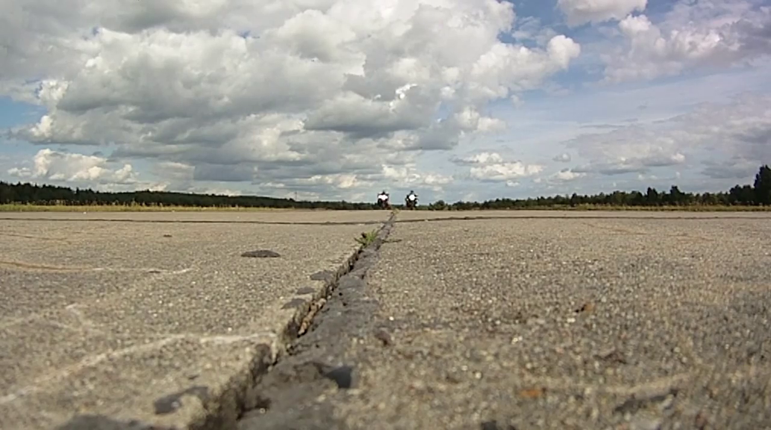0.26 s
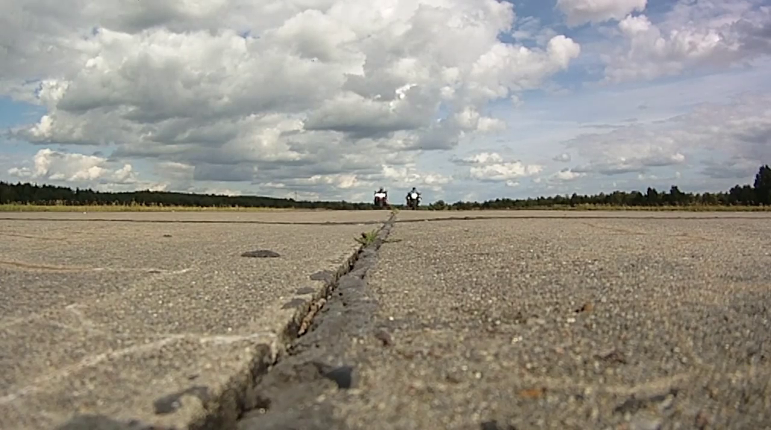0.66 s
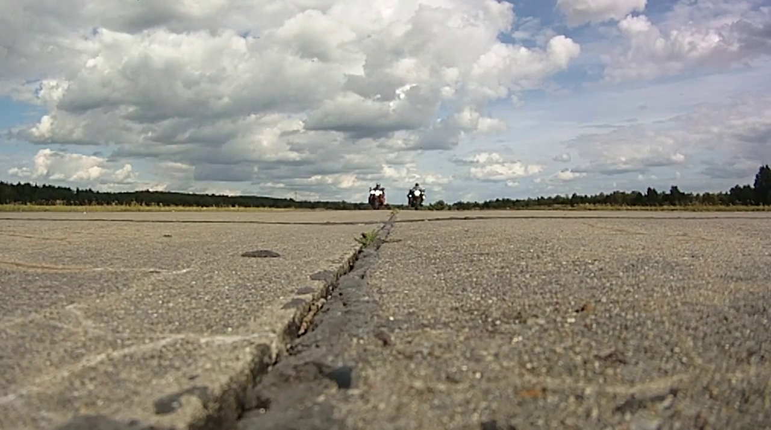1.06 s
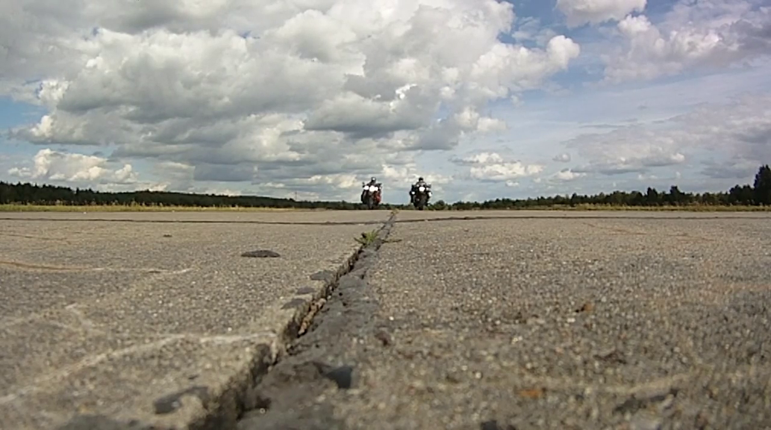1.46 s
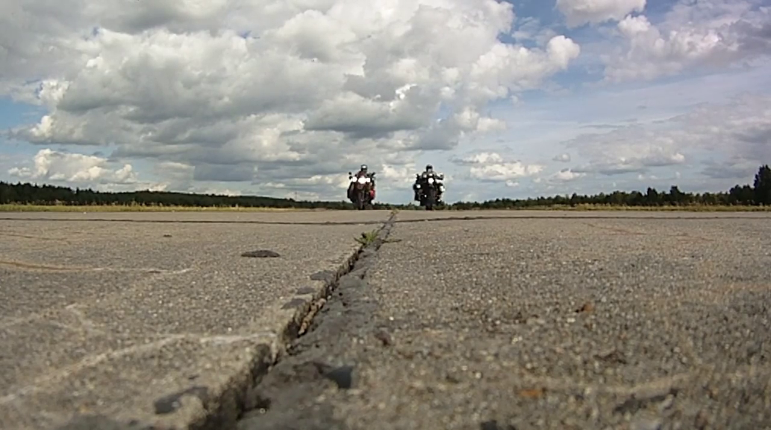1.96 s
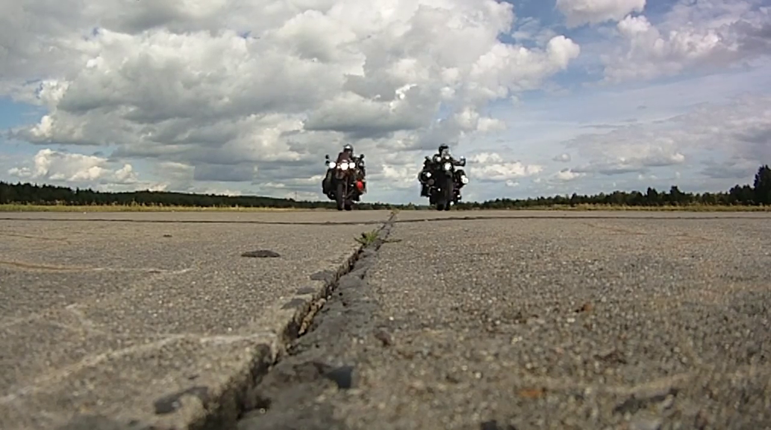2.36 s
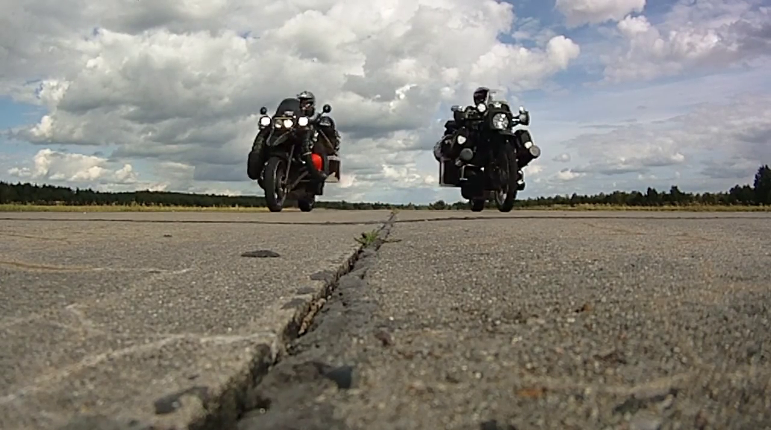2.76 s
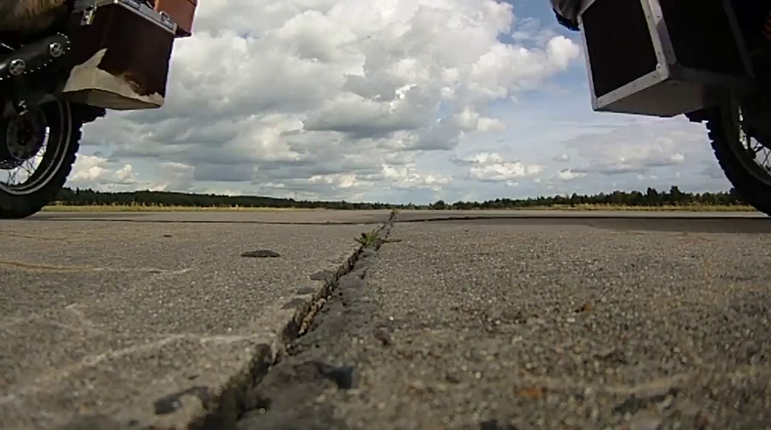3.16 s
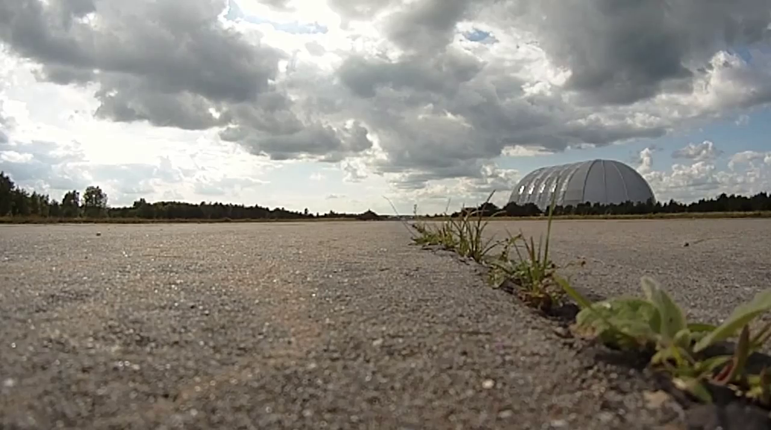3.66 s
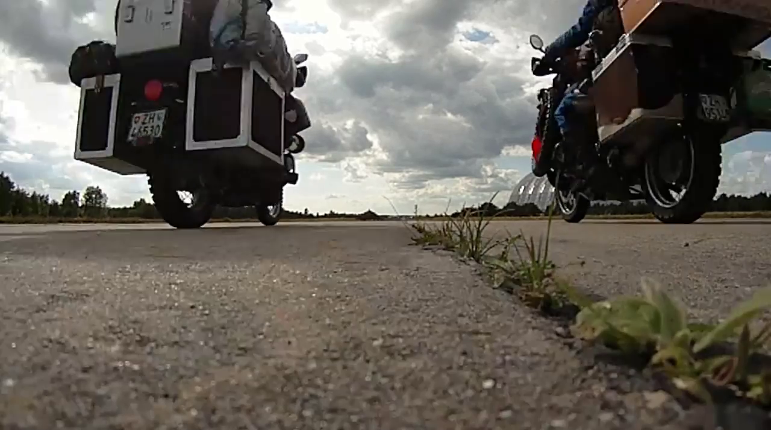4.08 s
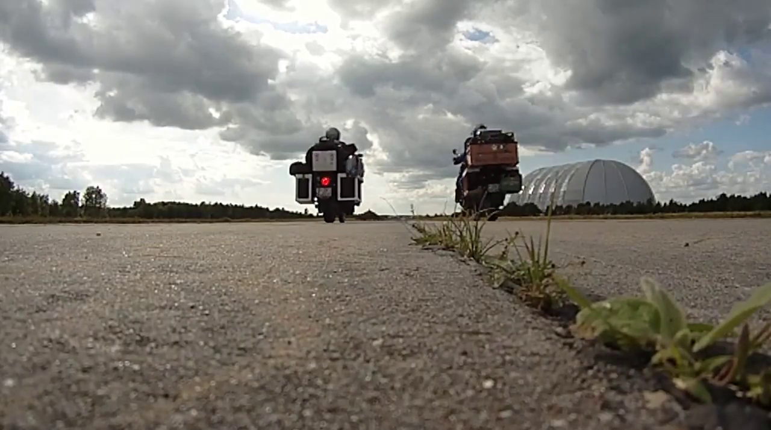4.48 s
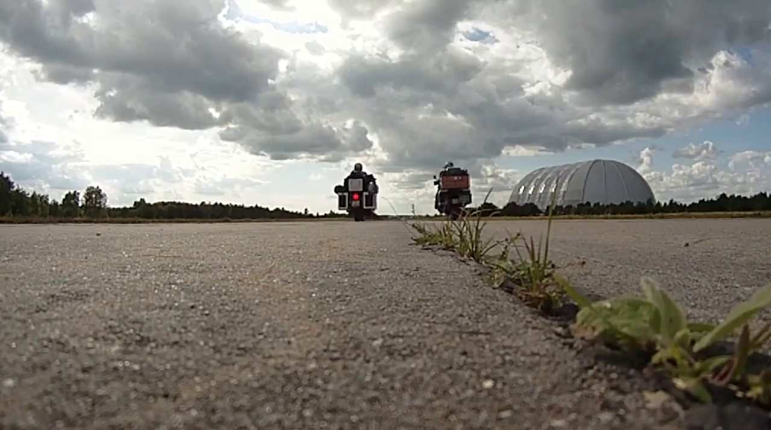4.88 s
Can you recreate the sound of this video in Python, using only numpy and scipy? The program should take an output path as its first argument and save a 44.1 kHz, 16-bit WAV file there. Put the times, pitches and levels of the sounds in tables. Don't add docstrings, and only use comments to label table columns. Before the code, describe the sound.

Two heavy twin-cylinder motorcycles approach from far off, throb louder, roar past a ground-level microphone, then pass again with clipped, pumping exhaust blasts.

```python
import sys
import numpy as np
from scipy import signal
from scipy.fft import rfft, irfft, next_fast_len
from scipy.io import wavfile
from scipy.ndimage import uniform_filter1d

SR = 44100
rng = np.random.default_rng(int(sys.argv[2]) if len(sys.argv) > 2 else 0)


def amplitude_ratio(level_db):
    exponent = np.asarray(level_db, float) / 20
    return 10 ** exponent


def waveform_to_disk(signal):
    frames = np.transpose(np.atleast_2d(signal))
    scaled = np.clip(frames, -1, 1) * 32767
    samples = np.round(scaled).astype(np.int16)
    wavfile.write(sys.argv[1], SR, samples)


N = 225991
T = np.arange(N) / SR
SIDES = np.array([[1], [-1]])
CHANGE_S = 3.631

# pitch_hz, level_db (per Hz)
HISS_SPECTRUM = [(2650, -30), (4500, -10), (6200, -11), (7600, -10), (7870, -4), (8150, -9), (10800, -13),
                 (12100, -7), (13000, -12), (14100, -8), (14700, -11), (15600, -15)]
HISS_LEVEL_DB = -64.5
# pitch_hz, level_db
CIRCUIT_TONES = [(7838, -75), (7865, -80), (7897, -75), (7957, -83), (8016, -84), (14040, -85),
                 (14099, -84), (14217, -91)]
# centre_s, over_breeze_db, half_width_s
WAKE_GUSTS = [
    (1.4, 5, 0.41),
    (3.1, -0.5, 0.54),
    (3.52, 14.5, 0.028),
    (3.62, 10, .03),
    (4.38, 18, 0.18),
    (4.6, 15, .07),
    (5.05, 14.5, 0.16),
]
# start_s, peak_db, ring_hz
LUGGAGE_RATTLES = [(3.4094, -37, 2390), (3.6047, -24.5, 3770), (4.118, -49, 2640), (4.267, -27, 3660),
                   (4.372, -30, 3780), (4.4147, -25, 2520), (4.485, -22, 2840), (4.576, -26, 2730),
                   (4.603, -31, 2750), (4.852, -27.5, 3820), (4.9207, -25.5, 2680), (4.985, -30, 2540),
                   (5.015, -30, 2660)]
# start_s, peak_db, ring_hz
BUCKLE_JINGLES = [(3.6305, -45, 7040), (3.651, -49, 7950), (3.699, -46, 7750), (4.2205, -40, 8900),
                  (4.301, -38, 8050), (4.3223, -43, 8600), (4.3562, -41, 8180), (4.5123, -52, 7700),
                  (4.7473, -40, 8040), (4.8431, -38, 8400), (4.9045, -41, 7600), (4.9349, -37, 7720),
                  (4.9523, -36.5, 7040), (4.985, -35, 7940), (5.0127, -35, 8300), (5.0411, -40, 7890),
                  (5.0671, -45, 7890), (5.097, -41, 6940)]
# start_s, peak_db
GRIT_TICKS = [
    (2.8944, -16),
    (2.9412, -25),
    (2.99, -13),
    (3.0374, -17),
    (3.6296, -30),
]
# time_s, pitch_hz, level_db, octave_level_db
GEAR_WHINE = [
    (4.89, 706, -34, -52),
    (4.93, 716, -24, -41),
    (5.02, 740, -25, -34),
    (5.07, 754, -25, -39),
    (5.124, 772, -24, -43),
]
# time_s, roar_level_db, ground_treble_loss_db
NEARNESS = [(0, -48, 12), (.4, -44, 16), (.8, -42, 19), (1.15, -36, 21), (1.9, -32, 18.5),
            (2.3, -27.5, 20.5), (2.62, -22, 8), (2.86, -22, 2.5), (3.2, -21.5, -1), (3.42, -20, 4),
            (3.55, -24.5, 1), (3.63, -23.5, 10), (3.632, -23.5, 3), (4.05, -22.5, -6), (4.3, -29.5, -6),
            (4.45, -24.5, -5), (4.75, -24, 2), (5.124, -25.5, -1.5)]
# low_hz, high_hz
ROAR_BAND_EDGES = [(350, 700), (700, 1500), (1800, 4000), (6000, 15000)]
# pitch_hz, level_db (per Hz)
LOW_ROAR = [(50, -4.5), (150, -3), (300, -5), (535, -5), (756, -11.5), (1200, -11), (1400, -16),
            (1640, -24), (1900, -26.5), (2440, -29), (2980, -36.5), (3500, -36.5), (4100, -38), (4500, -45)]
# (per Hz, against HIGH_ROAR_DB)
HIGH_ROAR = [(3060, -37), (5200, -8), (5780, -7.5), (6510, -1.5), (7240, -2), (8190, 2), (8980, -3.5),
             (10700, 2), (11800, -4.5), (14300, -3), (15600, -10)]
HIGH_ROAR_DB = -40
# pitch_hz, added_db
REAR_COLOUR = [(300, 0), (375, 4), (450, -2.5), (750, 2.5), (1200, -3), (2000, -4.5), (2650, 2),
               (3300, -1.5), (3950, 1.5), (4700, -6), (5500, 8.5), (6500, -5), (8000, -2), (10000, -6),
               (15000, -0.5)]
# close_level_db, roar_share, treble_loss_share, rear_added_db, second_pass_added_db
ROAR_LAYERS = [(-24.5, 0.61, 0.013, -5, 4.5), (-22, 1, 0.011, -0.1, -0.7), (-35, 1.01, 0.13, -0.1, -0.5),
               (-45, 0.51, 0.88, -0.5, -0.3), (-50, 0.54, 0.91, -10, 2.5)]
NEAR_ROAR_DB = -22
THROTTLE_ADDED_DB = [5.25, 1.9, .1, .1, .1]
# time_s, rear_share (0-1)
REAR_SHARE = [
    (3.15, 0),
    (3.45, 1),
    (3.63, 1),
    (3.632, 0),
    (3.8, 0),
    (4.13, 1),
]
# time_s, crank_rate_hz, exhaust_level_db
ENGINES = [(0, 41.48, -25.5), (1.2, 42.15, -20.5), (2.05, 41.9, -16.5), (2.7, 42.48, -10.5),
           (3.2, 42.49, -13), (3.4, 41.05, -16), (3.5, 40.14, -12), (3.63, 38.5, -13), (3.632, 42.62, -9.5),
           (3.95, 42.07, -13), (4.1, 40.84, -11), (4.2, 38.93, -9.5), (4.45, 39, -13), (4.57, 36.61, -9.5),
           (4.67, 38.6, -14.5), (4.72, 39, -22), (4.85, 38.3, -15), (5.124, 37.18, -15)]
# time_s, second_bike_lag_turns
BIKE_LAG = [(0, -.08), (.46, -.05), (.67, .08), (.86, .25), (1.2, .5), (1.45, .615), (1.7, .75),
            (2.03, .87), (2.4, .95), (2.77, 1.05), (3, 1.16), (3.1, 1.25), (3.2, 1.37), (3.48, 1.48),
            (3.63, 1.52), (3.73, 1.75), (3.95, 2), (4.2, 2.1)]
# order, level_db (against exhaust), rear_added_db, second_bike_share (0-1), phase_turns
LEADING_ORDERS = [(2, 0.8, -0.6, 0.82, 0), (3, -8.5, 5.5, 0.44, 0.62), (5, -10, 1.5, 0.1, 0.34),
                  (7, -12, -7, 0.05, 0.2)]
# order, leading_order, level_db (against it)
FOLLOWING_ORDERS = [(1, 3, -9.5), (1.5, 3, -19), (2.5, 3, -12.5), (4, 5, -12.5), (4.5, 5, -13),
                    (6, 5, -10.5), (8, 7, -5), (9, 7, -13), (10, 7, -31)]
# order, second_pass_added_db, abreast_added_db
PIPE_SWING = [(2, -1, -3), (3, -0.85, 4.5), (5, 1, 7), (7, 1.5, .1)]
ABREAST_TIMES = [3.42, 4.06]
# start_s, gain_drop_db
OVERLOAD_BLASTS = [(3.4955, 13.5), (3.5474, 7), (3.6236, 17), (4.1342, 10), (4.184, 16), (4.2771, 9),
                   (4.328, 11.5), (4.417, 23), (4.4906, 15), (4.5125, 9.5), (4.6248, 9), (4.6759, 26.5),
                   (4.7538, 4), (4.806, 17.5), (4.8618, 16.5), (4.9369, 7), (4.993, 15.5), (5.0486, 17.5),
                   (5.1014, 18)]
# centre_s, extra_drop_db, half_width_s
SLOW_RELEASES = [
    (3.56, 2.5, 0.016),
    (4.345, 5, 0.011),
    (4.65, 3, .02),
    (4.697, 6, 0.012),
    (5.118, 3.5, .012),
]
SECOND_FIRING_TURNS = 0.6


def unit(x):
    return x / np.sqrt(np.mean(x ** 2))


def columns(table):
    s, *cols = np.transpose(table)
    return [np.interp(T, s, c) for c in cols]


def bump(s, width):
    return np.exp(-((T - s) / width) ** 2)


def colour(points):
    size = next_fast_len(N)
    hz = np.arange(size // 2 + 1) * SR / size + 1
    f, db = np.transpose(points)
    return hz, rfft(rng.standard_normal(size)) * amplitude_ratio(np.interp(np.log(hz), np.log(f), db))


def coloured_noise(points):
    return unit(irfft(colour(points)[1])[:N])


def walk(rate):
    hold = int(SR / rate)
    steps = np.repeat(rng.standard_normal(N // hold + 1), hold)
    return unit(uniform_filter1d(uniform_filter1d(steps, hold), hold)[:N])


def strike(times, sizes, shape):
    train = np.zeros(N)
    np.add.at(train, np.clip((np.asarray(times) * SR).astype(int), 0, N - 1), sizes)
    return signal.fftconvolve(train, shape)[:N]


def electronics():
    mid, side = coloured_noise(HISS_SPECTRUM), coloured_noise(HISS_SPECTRUM)
    tones = sum(np.sqrt(2) * amplitude_ratio(db) * np.sin(2 * np.pi * hz * T) for hz, db in CIRCUIT_TONES)
    return amplitude_ratio(HISS_LEVEL_DB) * (mid + 0.74 * side * SIDES) + tones


def wind(roar_db):
    shape = [(8, -17), (25, -10), (40, 10.5), (55, 14), (90, -9), (150, -6.5), (300, -15.0), (1500, -45.5),
             (5000, -88)]
    breeze_db = -30 + 0.32 * (roar_db - NEAR_ROAR_DB)
    wake_db = sum(db * bump(s, width) for s, db, width in WAKE_GUSTS)
    mid, side = coloured_noise(shape), coloured_noise(shape)
    return amplitude_ratio(breeze_db + wake_db + 2 * walk(13)) * (mid + 0.08 * side * SIDES)


def rattles():
    t, out = T[:900], 0
    swell = (t / 0.003) * np.exp(1 - t / 0.003)
    for s, db, hz in LUGGAGE_RATTLES + BUCKLE_JINGLES:
        rough = 1 + 0.98 * unit(uniform_filter1d(rng.standard_normal(len(t)), size=int(260000 / hz)))
        out = out + strike([s], amplitude_ratio(db - 7), rough * np.sin(2 * np.pi * hz * t) * swell)
    tick = np.diff(rng.standard_normal(301)) * np.exp(-T[:300] / 0.001)
    s, db = np.transpose(GRIT_TICKS)
    return out + strike(s, amplitude_ratio(db - 13), tick)


def whine():
    hz, db, octave_db = columns(GEAR_WHINE)
    phase = 2 * np.pi * np.cumsum(hz) / SR + 0.35 * walk(50)
    tone = amplitude_ratio(db + 2 * walk(40)) * np.sin(phase)
    octave = amplitude_ratio(octave_db + 2 * walk(40)) * np.sin(2 * phase)
    fade = np.clip((T - GEAR_WHINE[0][0]) / 0.017, 0, 1)
    return fade * np.sqrt(2) * (tone + octave)


def layer_levels(roar_db, loss_db, behind):
    opened = np.clip((T - 4.38) / 0.053, 0, 1)
    levels = []
    for (db, share, loss_share, rear_db, pass_db), open_db in zip(ROAR_LAYERS, THROTTLE_ADDED_DB):
        near = db + share * (roar_db - NEAR_ROAR_DB) - loss_share * loss_db
        levels.append(near + rear_db * behind + pass_db * (T > CHANGE_S) + open_db * opened)
    return levels


def roar(turns, band_db, chain_db, behind):
    hz, spec = colour(LOW_ROAR + [(f, db + HIGH_ROAR_DB) for f, db in HIGH_ROAR[1:]])
    rear = amplitude_ratio(np.interp(hz, *np.transpose(REAR_COLOUR)))
    lift = []
    for db, (lo, hi) in zip(band_db, ROAR_BAND_EDGES):
        power = 2 / (2 * len(hz)) ** 2 * np.sum(np.abs(spec[(hz > lo) & (hz < hi)]) ** 2)
        lift.append(db - 10 * np.log10(power))
    centres = np.log2([np.sqrt(lo * hi) for lo, hi in ROAR_BAND_EDGES])
    out, swell, rasp = 0, walk(18), walk(110)
    for octave in np.arange(5.5, 14.4, 0.5):
        band = spec * np.cos(np.pi / 2 * np.clip(2 * np.abs(np.log2(hz) - octave), 0, 1)) ** 2
        part = (1 - behind) * irfft(band)[:N] + behind * irfft(band * rear)[:N]
        place = np.interp(octave, centres, np.arange(4))
        low = min(int(place), 2)
        db = lift[low] + (place - low) * (lift[low + 1] - lift[low])
        flicker = 0.3 * swell + (0.66 + behind * place / 3) * rasp + 0.72 * walk(10)
        out = out + part * amplitude_ratio(db + flicker)
    chain = coloured_noise([(3900, -43), (4400, -3), (4800, -5), (5200, -12.5), (5600, -44)])
    out = out + chain * amplitude_ratio(chain_db - 0.5 + walk(18))
    puff = np.exp(-(turns % 1) / 0.13) + 0.92 * np.exp(-((turns + 0.363) % 1) / 0.11)
    return out * unit(1 + 0.54 * uniform_filter1d(puff, size=90))


def crank(hz):
    turns, hits = np.cumsum(hz) / SR, np.array(OVERLOAD_BLASTS)[:, 0]
    slip = [0.0]
    for place in np.interp(hits, T, turns):
        miss = (place - slip[-1] - np.array([0, SECOND_FIRING_TURNS]) + 0.5) % 1 - 0.5
        slip.append(slip[-1] + miss[np.argmin(np.abs(miss))])
    slip, first = np.array(slip[1:]), hits < CHANGE_S
    exact = [np.interp(T, hits[pick], slip[pick]) for pick in (first, ~first)]
    smooth = [uniform_filter1d(s, size=SR // 4) for s in exact]
    return turns - np.where(T < CHANGE_S, *exact), turns - np.where(T < CHANGE_S, *smooth)


def beating(lag, level_db, behind):
    out = {}
    abreast = sum(bump(s, 0.062) for s in ABREAST_TIMES)
    balance = np.where(T < CHANGE_S, 1, 0.58)
    for (k, db, rear_db, share, phase), (_, pass_db, swing_db) in zip(LEADING_ORDERS, PIPE_SWING):
        second = share * balance
        both = np.abs(1 + second * np.exp(2j * np.pi * (k * lag + phase))) / (1 + second)
        direction_db = rear_db * behind + pass_db * (T > CHANGE_S) + swing_db * abreast
        out[k] = level_db + db + direction_db + 20 * np.log10(both + 1e-3)
    return out


def exhaust(turns, even_turns, order_db, blast_db, behind):
    rows = [(k, k, 0) for k in order_db] + FOLLOWING_ORDERS
    lines = 0
    for k, lead, db in rows:
        waver = 0.14 * np.sqrt(k) * walk(9) + (1 - behind) * rng.uniform(-np.pi, np.pi)
        level = amplitude_ratio(order_db[lead] + db + 0.74 * walk(12))
        lines = lines - level * np.cos(2 * np.pi * k * even_turns + waver)
    t, blasts = T[:900], 0
    blast = -np.exp(-((t - 0.0031) / 0.00074) ** 2) + 0.26 * np.exp(-((t - 0.009) / 0.0022) ** 2)
    for firing in (0, SECOND_FIRING_TURNS):
        starts = T[1:][np.diff(np.floor(turns - firing + 0.12)) > 0]
        uneven = amplitude_ratio(3.7 * rng.standard_normal(len(starts)))
        blasts = blasts + strike(starts, uneven, blast)
    return np.sqrt(2) * lines + behind * amplitude_ratio(blast_db + 12.5) * blasts


def scene():
    hz, level_db = columns(ENGINES)
    lag, behind = columns(BIKE_LAG)[0], columns(REAR_SHARE)[0]
    roar_db, loss_db = columns(NEARNESS)
    turns, even_turns = crank(hz)
    *band_db, chain_db = layer_levels(roar_db, loss_db, behind)
    order_db = beating(lag, level_db, behind)
    bikes = exhaust(turns, even_turns, order_db, level_db - 14, behind)
    bikes = bikes + roar(turns, band_db, chain_db, behind)
    bikes = bikes + behind * amplitude_ratio(-27) * np.roll(bikes, shift=3001) * SIDES
    return electronics() + wind(roar_db) + rattles() + whine() + bikes


def limiter(dry):
    s, drop_db = np.transpose(OVERLOAD_BLASTS)[:, :, None]
    since = T - s - 0.0009
    held = (since > 0) & ((T < CHANGE_S) | (s > CHANGE_S))
    recovery = np.minimum(since / 0.00035, 1) * np.exp(-np.abs(since) / 0.018)
    gain_db = -np.sum(drop_db * held * recovery, axis=0)
    gain_db = gain_db - sum(db * bump(at, width) for at, db, width in SLOW_RELEASES)
    pulse = np.exp(-((since + 0.00089) / 0.00091) ** 2)
    blast = -np.sum(amplitude_ratio(drop_db * 0.27) * 0.653 * pulse, axis=0)
    wet = dry * amplitude_ratio(gain_db) * np.minimum(T / 0.0015, 1)
    wet = wet / (1 + (wet / 0.9) ** 4) ** 0.25
    return np.clip(wet + blast, -1, 1)


def top_cut(x):
    return signal.sosfilt(signal.butter(12, 15730, fs=SR, output="sos"), x)


def record(dry):
    mix = limiter(dry)
    return top_cut(mix)


dry = scene()
out = record(dry)
waveform_to_disk(out)
```